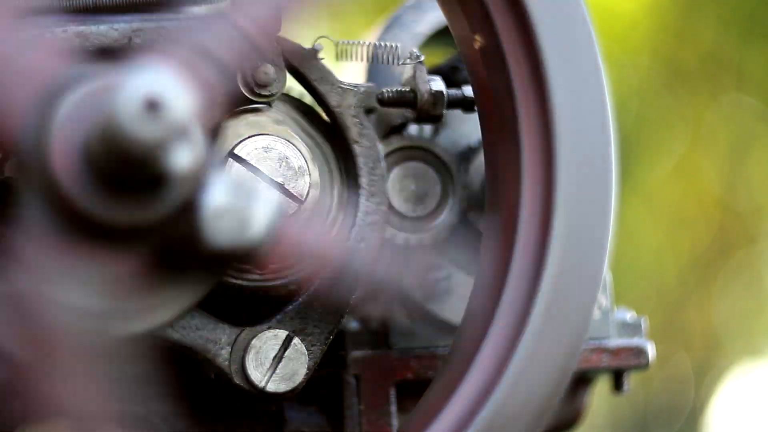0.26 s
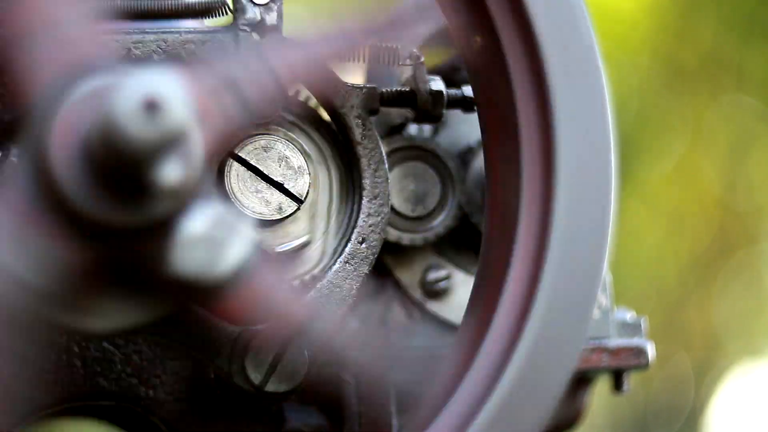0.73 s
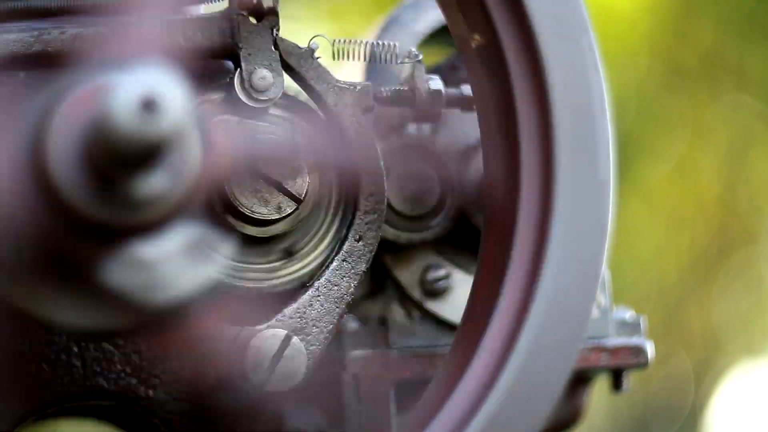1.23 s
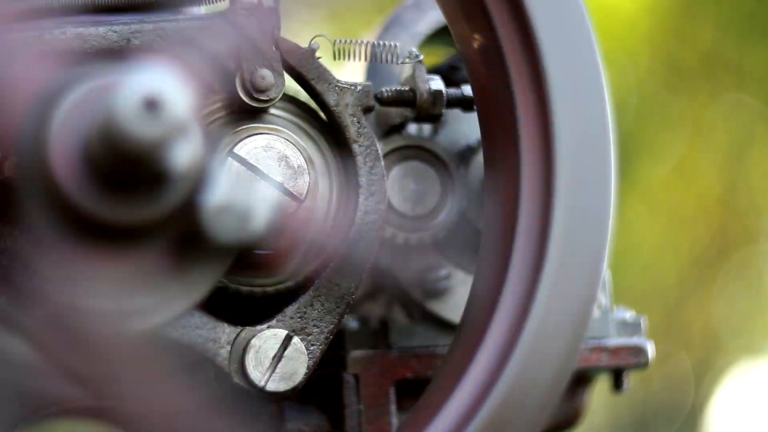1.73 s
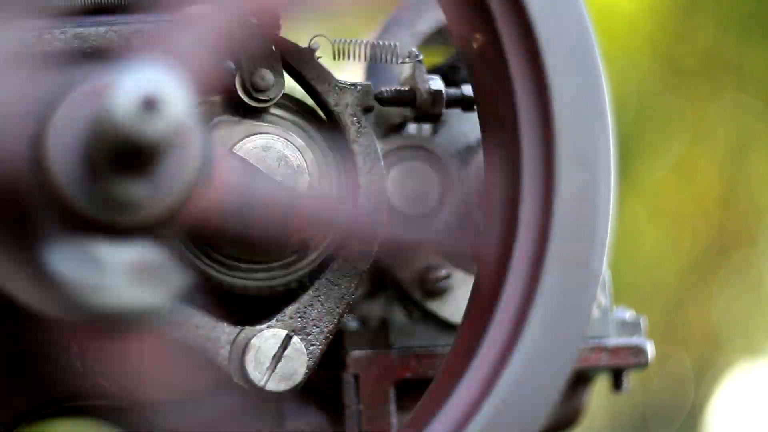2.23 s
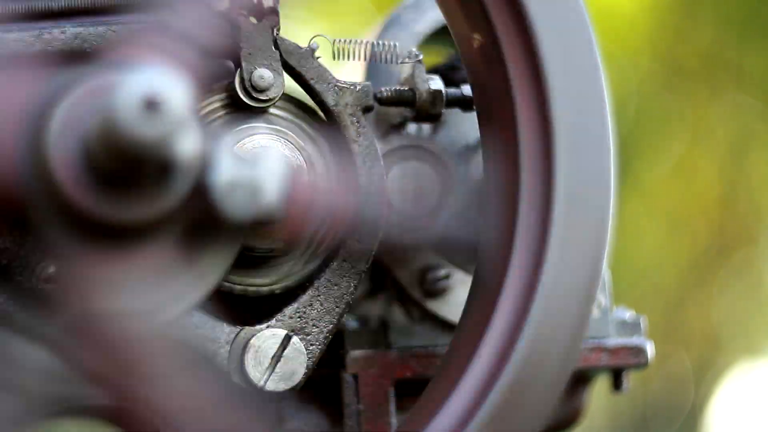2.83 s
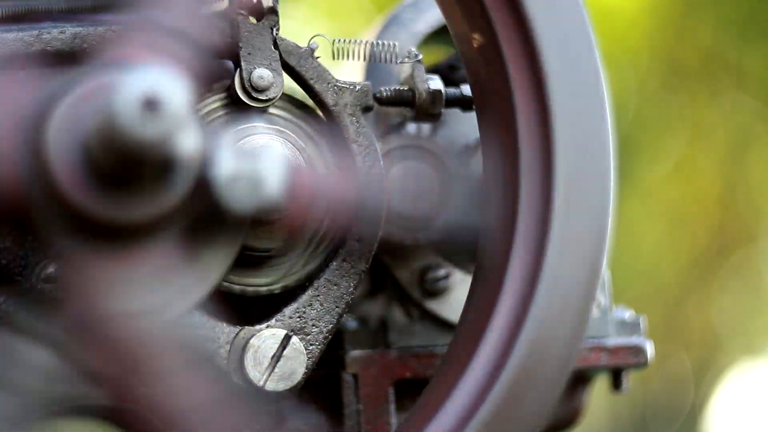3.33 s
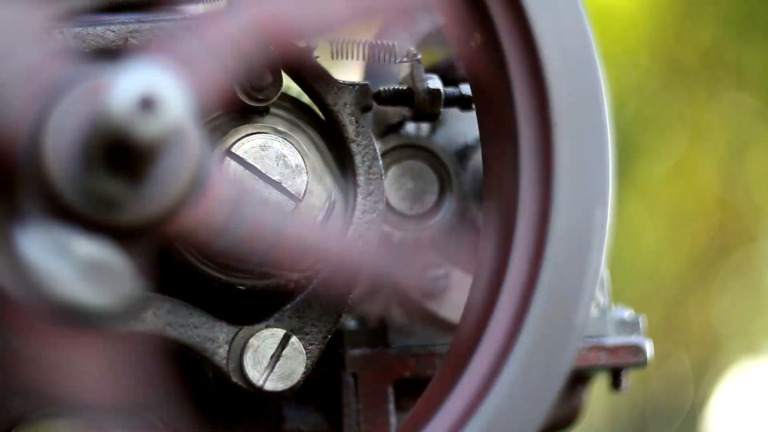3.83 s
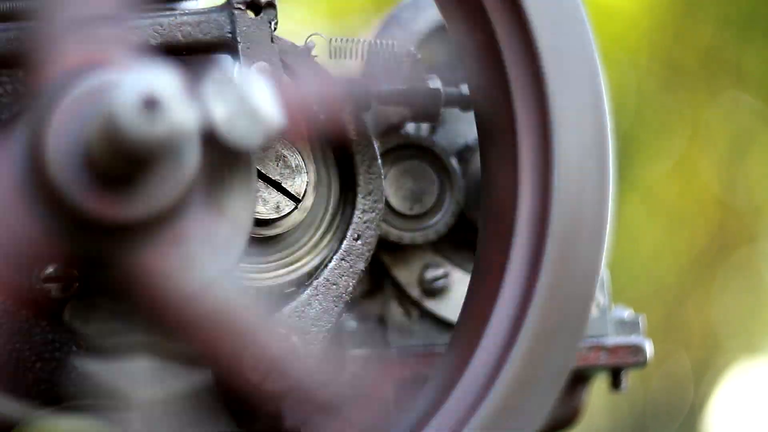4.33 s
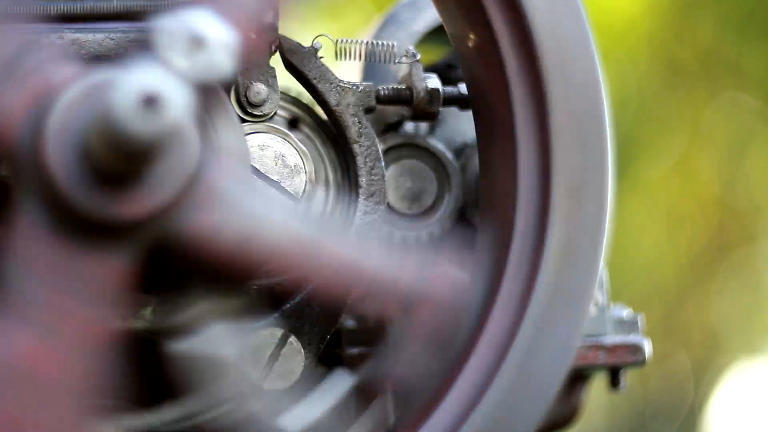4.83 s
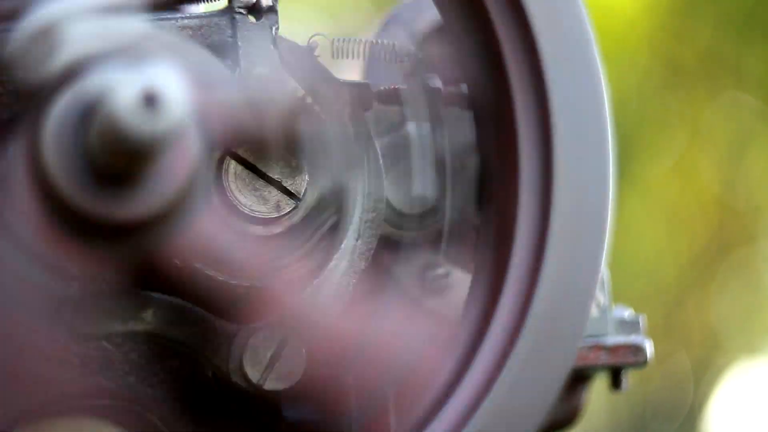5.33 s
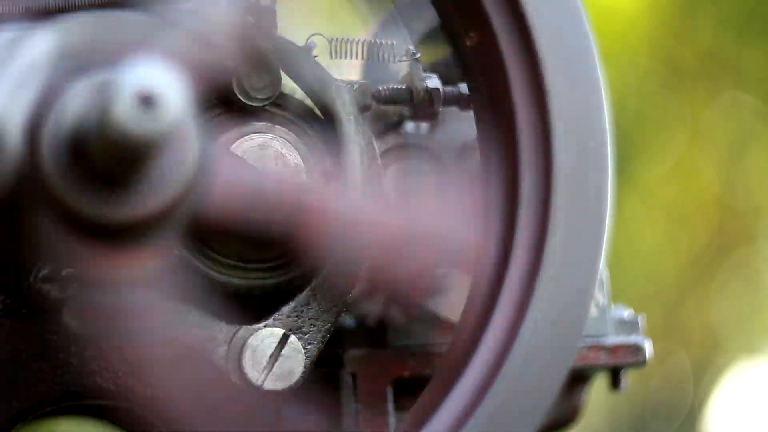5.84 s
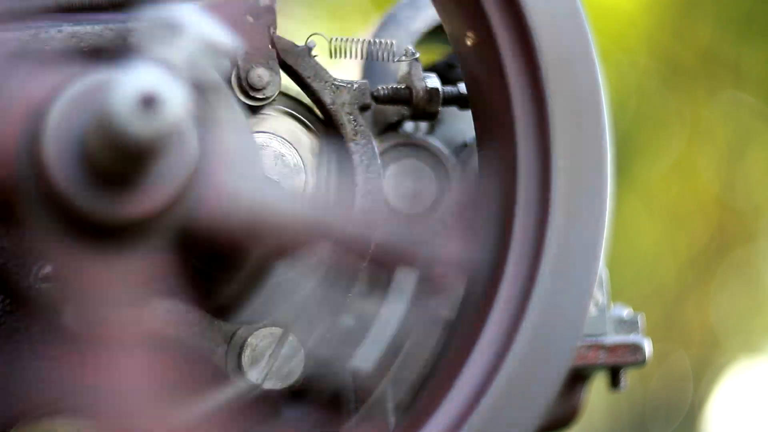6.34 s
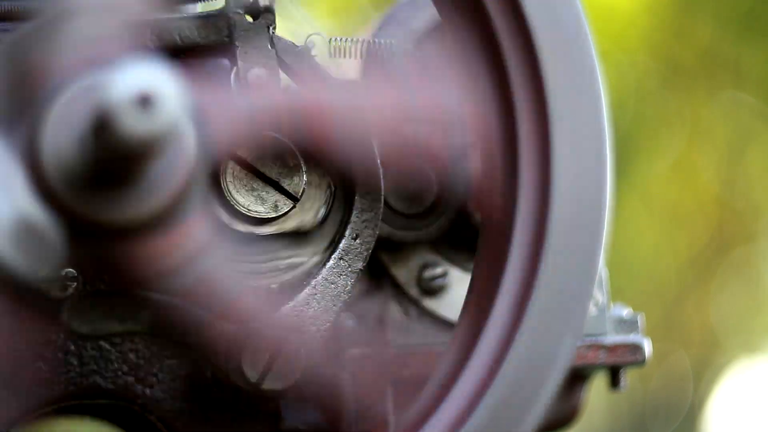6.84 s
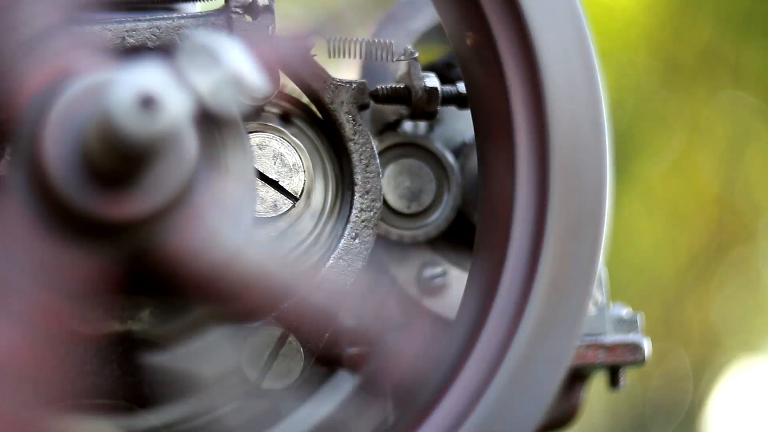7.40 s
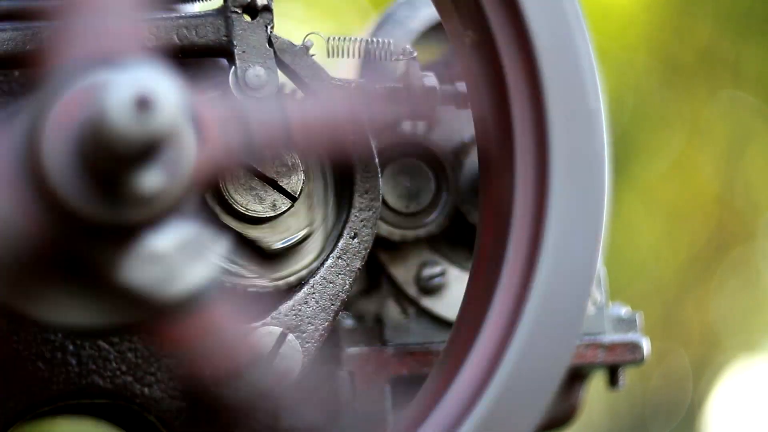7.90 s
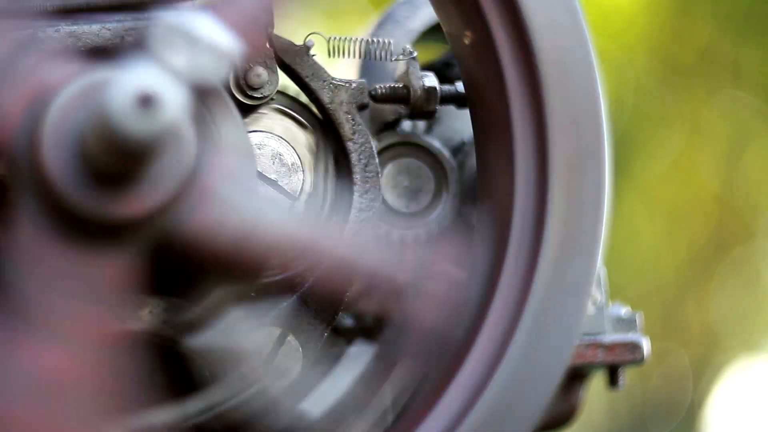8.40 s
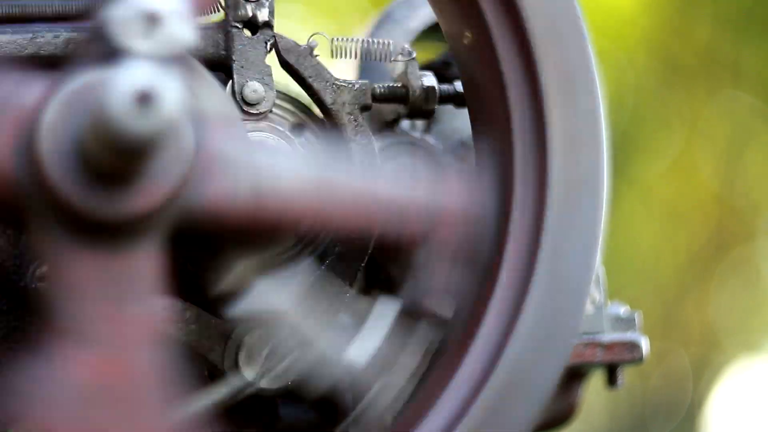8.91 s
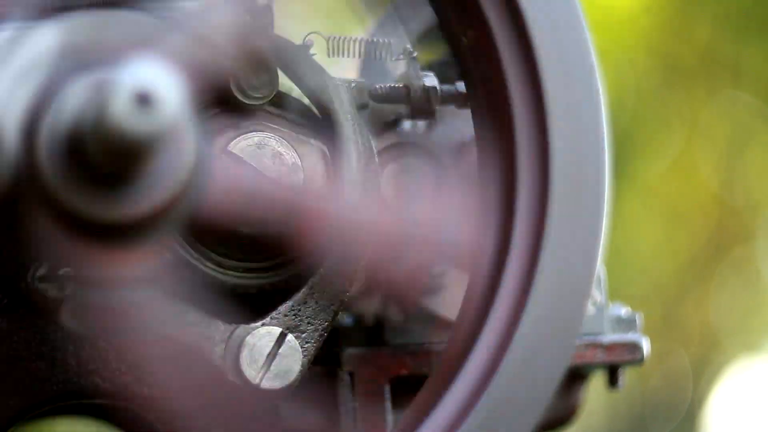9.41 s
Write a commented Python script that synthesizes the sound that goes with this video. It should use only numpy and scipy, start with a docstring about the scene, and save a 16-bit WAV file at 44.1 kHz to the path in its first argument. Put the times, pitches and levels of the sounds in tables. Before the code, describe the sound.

Close up outdoors, a small old hit-and-miss engine coasts with rapid metallic clacks, latch rattles and gear whirr. Almost at once the intake snorts, harder clacks follow and the exhaust puffs; the ticking jumps faster, then gradually slows for four seconds while breathy hoots grow. This happens three times, the last near the end. No room echo, barely any breeze.

```python
"""A small hit-and-miss engine outdoors, heard close, over a faint low stir of air.
It opens near the end of a coast: valve gear clacks at fixed cam angles, air hoots through the exhaust valve.
Then the latch lets go: the intake valve snorts, the charge fires and leaves in a puff, the wheels run fast.
Friction and drag slow them again, the latch rattles ever later in the turn and the hoots grow louder.
Snort and puff come three times; blows are noise cracks plus ringing modes, gas and gears shaped noise."""
import sys
import numpy as np
from scipy import signal
from scipy.fft import rfft, irfft, next_fast_len
from scipy.io import wavfile
from scipy.ndimage import uniform_filter1d

SR = 44100
rng = np.random.default_rng(int(sys.argv[2]) if len(sys.argv) > 2 else 0)


def wav_record(signal):
    """Record a signal, one row per channel, as 16-bit PCM in the file named by sys.argv[1]."""
    frames = np.transpose(np.atleast_2d(signal))
    bounded = np.clip(frames, -1, 1)
    # unit amplitude maps onto the largest positive 16-bit level
    quanta = np.round(bounded * 32767).astype(np.int16)
    wavfile.write(sys.argv[1], SR, quanta)


N = 426006
TIME = np.arange(N) / SR


def amp(db):
    """Decibels to gain."""
    return 10 ** (np.asarray(db) / 20)


def evened(x):
    """Scales each row to rms 1."""
    return x / np.sqrt(np.mean(x ** 2, axis=-1, keepdims=True) + 1e-20)


def add(mix, start_s, sound):
    """Mixes a sound in at a start time."""
    part = mix[max(round(start_s * SR), 0):][:len(sound)]
    part += sound[:len(part)]


def decay(t, t60_s):
    """Exponential decay by 60 dB in t60_s."""
    return np.exp(-np.log(1000) * t / t60_s)


def bump(t, centre_s, half_s):
    """Gaussian envelope, down to 1/e at half_s from its centre."""
    return np.exp(-((t - centre_s) / half_s) ** 2)


def wander(shape, size):
    """Smooth random wavering of rms 1 along the last axis."""
    smooth = uniform_filter1d(rng.standard_normal(shape), size)
    return evened(uniform_filter1d(smooth, size))


def noise(colour, shape, band_hz=(0, np.inf), ripple_db=0, ripple_size=50):
    """Rows of rms 1 noise with a given spectrum within a band; ripple gives each row its own peaks."""
    size = next_fast_len(shape[-1])
    hz = np.fft.rfftfreq(size, 1 / SR)
    colour_hz, colour_db = np.transpose(colour)
    ripple = ripple_db * wander(shape[:-1] + hz.shape, size=ripple_size)
    gain = amp(np.interp(np.log(hz + 1), np.log(colour_hz), colour_db) + ripple)
    gain = gain * (hz >= band_hz[0]) * (hz < band_hz[1])
    spectrum = rfft(rng.standard_normal(shape[:-1] + (size,))) * gain
    return evened(irfft(spectrum, size)[..., :shape[-1]])


# outdoor air, level: (time [s], level [dB])
BREEZE_LEVEL = [(0, -84), (1.1, -78), (1.7, -86), (2.1, -77), (4.4, -78), (5.1, -78), (5.5, -88),
                (7.1, -88), (8.3, -79), (8.6, -70), (9.1, -72), (9.5, -90)]
# outdoor air, spectrum: (frequency [Hz], relative level [dB])
BREEZE_COLOUR = [(10, 2.5), (25, -9), (45, 8), (80, 2.5), (130, 2), (300, -20), (2000, -47)]


def breeze():
    """Faint low stir of air: shaped noise with a slowly changing level."""
    return amp(np.interp(TIME, *np.transpose(BREEZE_LEVEL))) * noise(BREEZE_COLOUR, (N,))


# coasts of the flywheels: (time at which the cam comes round [s], speed then [turns/s])
COASTS = [(-2.9117, 10.995), (1.1366, 10.995), (5.185, 10.982), (9.2447, 10.97)]
FRICTION_TURNS_PER_S2, DRAG_PER_S = 0.366, 0.11667  # dry friction; share of speed lost per s
LAST_TURN = 30  # crank turn of a coast on which the governor lets the latch go


def coasting(angle_turns=0, every=1):
    """Rows (time [s], speed in that turn [turns/s], turn number) of a slowing crank passing an angle."""
    t, rows = np.arange(-SR // 2, 5 * SR, 50) / SR, []
    friction_speed = FRICTION_TURNS_PER_S2 / DRAG_PER_S
    for start_s, first_speed in COASTS:
        speed = (first_speed + friction_speed) * np.exp(-DRAG_PER_S * t) - friction_speed
        turned = (first_speed - speed - FRICTION_TURNS_PER_S2 * t) / DRAG_PER_S
        for turn in np.arange(-2, LAST_TURN + 1, every) + angle_turns:
            s = start_s + np.interp(turn, turned, t)
            if -1 <= turn < LAST_TURN + 0.5 and s > -0.5:
                # speed at the start of the turn; angles just before a turn count as its start
                rows.append((s, np.interp(np.floor(turn + 0.05), turned, speed), turn))
    return np.array(rows)


# running noise against speed: (speed [turns/s], relative level [dB])
RUNNING_LEVEL = [(6.3, -58.5), (7.2, -60.5), (8.2, -62), (9.7, -63.5), (10.5, -60.5), (11, -59),
                 (11.15, -56.5)]
SHUT_DB = -64.5  # relative level, quieter with the exhaust valve shut
COMPRESSION_DELAY_S, EXHAUST_DELAY_S = 0.055, 0.005  # turn starts after snort and puff


def crank_turns():
    """Rows (start [s], relative running noise level [dB]) for all turns, coasting or working."""
    s, speed, turn = coasting().T
    level_db = np.where(turn < LAST_TURN, np.interp(speed, *np.transpose(RUNNING_LEVEL)), SHUT_DB)
    working_s = np.ravel(np.add(FIRINGS, [COMPRESSION_DELAY_S, EXHAUST_DELAY_S]))
    return np.array(sorted([*zip(s, level_db), *((start_s, SHUT_DB) for start_s in working_s)]))


# quickly dying modes of a rattle, also of slack ticks: (frequency [Hz], relative level [dB])
RATTLE_COLOUR = [(100, -37), (250, -7), (450, 3.5), (600, -0.5), (1000, -0.5), (1600, -2.5), (2800, 4.5),
                 (3800, -5), (4600, 5.5), (5600, -5), (7000, -7.5), (9000, -9.5), (12000, -15),
                 (16000, -35)]


def loose_play(turns, count=12, base_db=-58, spread_db=3.0, t60_s=0.014, ripple_db=7,
               busiest_turns=0.5, spread_turns=0.25):
    """Slack in gear teeth and linkage ticks faintly, mostly in mid turn, each tick with its own colour."""
    out, t = np.zeros(N), np.arange(SR // 50) / SR
    starts = np.array([s for s, _ in turns if 0 < s < N / SR])
    for start_s, length_s in zip(starts, np.diff(starts, append=N / SR)):
        ticks = noise(RATTLE_COLOUR, (count, len(t)), ripple_db=ripple_db, ripple_size=24)
        ticks = ticks * decay(t, t60_s) * (1 - np.exp(-t / 0.00022))
        sizes = amp(base_db + spread_db * np.minimum(rng.exponential(1, count), 3))
        shares = rng.normal(busiest_turns, spread_turns, count) % 1
        for share, size, tick in zip(shares, sizes, ticks):
            add(out, start_s + share * length_s, size * tick)
    return out


# spectra of gear rumble and piston swish: (frequency [Hz], relative level [dB])
RUMBLE_COLOUR = [(60, -36), (140, -13.5), (210, -3.5), (290, 2), (360, 1), (490, 0.5), (580, -11.5),
                 (680, -2), (800, -5), (1200, -24), (3000, -54)]
SWISH_COLOUR = [(400, -23), (800, 2), (1050, 12.5), (1180, 1), (1275, 13.5), (1400, 6.5), (1750, 6.5),
                (2400, 8), (3400, 4.5), (5000, 5.5), (7500, -3), (12000, -17.5), (16000, -67)]
# course of one turn: (share of turn, rumble [relative dB], swish [relative dB],
# whirr [relative dB], whirr centre [Hz])
STROKE = [(0, -3, -5, -12, 2104), (.15, -4.5, 3, -9, 2400), (.28, 2, 5, 0, 2782), (.44, 6.5, 8, -7, 2860),
          (.62, -2.5, -5, 6, 2478), (.73, 2.5, 4.5, -0.5, 2172), (.86, -1, -6.5, -7, 2036),
          (1, -7, -1.5, -20, 2102)]


def running(turns, rumble_trim_db=-2, swish_trim_db=-4, whirr_trim_db=-7.5, swish_db_per_octave=4,
            reference_turn_s=0.16, whirr_width_hz=260, grain_db=3.5):
    """Gears rumble, the piston slides, a whirr rises and falls with its travel: noise shaped by turn."""
    s, turn_db = turns.T
    edges = np.r_[2 * s[0] - s[1], s, 2 * s[-1] - s[-2]]
    turn_share = np.interp(TIME, edges, np.arange(len(edges))) % 1
    middle = (edges[1:-1] + edges[2:]) / 2
    octaves_fast = np.interp(TIME, middle, np.log2(reference_turn_s / np.diff(edges)[1:]))
    share, *columns = np.transpose(STROKE)
    gear_db, slide_db, air_db, whirr_hz = (np.interp(turn_share, share, c) for c in columns)
    gears = amp(rumble_trim_db + gear_db) * noise(RUMBLE_COLOUR, (N,))
    # sliding faces catch and let go
    grain = evened(amp(grain_db * wander((N,), size=70)))
    swish_db = swish_trim_db + slide_db + swish_db_per_octave * octaves_fast
    piston = amp(swish_db) * grain * noise(SWISH_COLOUR, (N,))
    # narrow noise carried on the moving pitch
    lowpass = signal.butter(2, whirr_width_hz / 2, fs=SR, output="sos")
    real, imag = signal.sosfilt(lowpass, rng.standard_normal((2, N)))
    carrier = np.exp(2j * np.pi * np.cumsum(whirr_hz) / SR)
    whirr = amp(whirr_trim_db + air_db) * evened(((real + 1j * imag) * carrier).real)
    return amp(np.interp(TIME, middle, turn_db)) * (gears + piston + whirr)


# air pumped through the open exhaust valve: (speed [turns/s], relative level [dB], base pitch [Hz])
HOOTS = [(6.35, -46.5, 414), (6.9, -47.5, 421), (7.2, -49.5, 442), (7.45, -59, 445), (8.6, -58, 435),
         (9.3, -69, 420), (10.9, -65, 405), (11.15, -52.5, 400)]
HOOT_ANGLE_TURNS = 0.392


def hoots(trim_db=1.3, half_s=0.0062, sag_per_s=8.76, tail_s=0.03, tail_db=-9, rough=0.28,
          scatter_db=1, detune=0.015):
    """The cylinder sounds like a blown bottle once a turn; pitch sinks as the piston draws back."""
    out, t = np.zeros(N), np.arange(-SR // 25, SR // 14) / SR
    swell = bump(t, 0, half_s) + amp(tail_db) * bump(t, tail_s, half_s)
    speeds, *columns = np.transpose(HOOTS)
    for s, speed, turn in coasting(HOOT_ANGLE_TURNS):
        if s < 0 or turn > LAST_TURN:
            continue
        db, hz = (np.interp(speed, speeds, c) for c in columns)
        db = db + scatter_db * rng.standard_normal()
        hz = hz * (1 + detune * rng.standard_normal())
        cycles = np.cumsum(hz * np.exp(-sag_per_s * np.maximum(t, 0))) / SR + rng.random()
        flutter = 1 + rough * evened(uniform_filter1d(rng.standard_normal(len(t)), size=200))
        tone = np.sqrt(2) * np.sin(2 * np.pi * cycles)
        add(out, s + t[0], amp(db + trim_db) * swell * flutter * tone)
    return out


# working strokes: (intake snort [s], exhaust puff [s])
FIRINGS = [(0.7647, 0.9385), (4.8140, 4.9878), (8.8713, 9.0472)]
# intake valve fluttering open and shut: (delay [s], relative level [dB], pitch [Hz], half length [s])
SNORT = [(-0.0208, -36.5, 200, 0.0018), (0, -32, 228, 0.0016), (0.0218, -37.5, 230, .0017)]
# burning charge, valve opening, blast, pipe ring: (delay [s], relative level [dB], pitch [Hz], half length [s])
PUFF = [(-0.030, -46, 410, 0.0034), (-0.001, -39.5, 670, 0.0032), (0.002, -41, 149, 0.0046),
        (0.014, -41.5, 255, 0.0037)]
# gas rushing around snort and puff: (delay [s], relative level [dB], half length [s])
INTAKE_RUSH = [(-0.033, -53, 0.026), (-0.021, -45, 0.0012), (-0.011, -45, 0.0075), (0.0005, -41, 0.0018),
               (0.019, -44, 0.0018), (0.025, -50, 0.005)]
EXHAUST_RUSH = [(-0.034, -49.5, 0.011), (0.003, -39.5, 0.0034)]
# spectrum of rushing gas: (frequency [Hz], relative level [dB])
GAS_COLOUR = [(35, -30), (75, 6), (110, -3), (350, -3), (600, -3.5), (1000, -1), (1500, -10), (2200, -9.5),
              (4000, -11), (12000, -30)]


def firings(ragged_db=5, port_hz=62):
    """Intake snort, then burning charge and ragged puff: short pressure pulses plus rushing gas noise."""
    out, t = np.zeros(N), np.arange(-SR // 8, SR // 8) / SR
    for times in FIRINGS:
        for s, pulses, rushes in zip(times, (SNORT, PUFF), (INTAKE_RUSH, EXHAUST_RUSH)):
            pressure = sum(amp(db) * bump(t, delay, half_s) * np.sin(2 * np.pi * hz * (delay - t))
                           for delay, db, hz, half_s in pulses)
            flow = sum(amp(db) * bump(t, delay, half_s) for delay, db, half_s in rushes)
            eddies = evened(amp(ragged_db * wander(t.shape, size=60)))
            add(out, s + t[0], pressure + flow * eddies * noise(GAS_COLOUR, t.shape))
    # small ports radiate no deep bass
    highpass = signal.butter(2, port_hz, "high", fs=SR, output="sos")
    return signal.sosfiltfilt(highpass, out)


# push rod blows, the cam going round once in two crank turns: (crank angle [turns],
# relative level above split [dB], same below split [dB], gain when slow [dB], gain when fast [dB])
CLACKS = [(0, -43.5, -43, 8, 4.5), (0.04, -43, -50.5, 3, -2), (0.086, -38.5, -53, 1, 0.5),
          (1.054, -40.5, -51.5, 6.5, 1), (1.08, -40.5, -57, -2, -1)]
# light knocks of the linkage, same columns
KNOCKS = [(0.282, -48, -49.5, 0.81, 6), (0.417, -52, -56.5, 0.9, -1), (1.19, -56, -62, 2, 5)]
# turns/s: blows change below SLOW, where the latch gives up its load, and from EASY up to FAST
SLOW, SLOW_RANGE, EASY, FAST = 6.62, 0.09, 9.84, 11.05


def cam_blows(contacts, body_share=0.5):
    """Each contact strikes at its own cam angle; its force changes at both ends of the speed range."""
    rows = []
    for angle, high_db, low_db, slow_db, fast_db in contacts:
        s, speed, turn = coasting(angle, every=2).T
        slow_gain_db = slow_db / (1 + np.exp((speed - SLOW) / SLOW_RANGE))
        fast_gain_db = fast_db * np.maximum(speed - EASY, 0) / (FAST - EASY)
        gain_db = slow_gain_db + fast_gain_db
        blow_rows = np.c_[s, high_db + gain_db, low_db + body_share * gain_db]
        rows += list(blow_rows[np.round(turn) < LAST_TURN])
    return rows


# latch blows, later as the governor weight sinks inward; first and second turn of the cam:
# (speed [turns/s], crank angle [turns], relative level above split [dB], same below split [dB])
LATCH_FIRST = [(6.85, 0.98, -41.5, -53), (7.2, 0.53, -58, -60), (7.55, 0.45, -48, -55),
               (7.9, 0.414, -45, -56), (9.1, 0.371, -43, -51.5), (9.8, 0.36, -41.5, -53.5),
               (11.3, 0.352, -38, -54)]
LATCH_SECOND = [(7, 1.6, -54, -58), (7.38, 1.472, -45.5, -50), (7.71, 1.423, -43.5, -50.5),
                (8.2, 1.385, -41, -51), (9, 1.369, -39, -50), (9.9, 1.354, -41, -54.5),
                (11.3, 1.354, -37.5, -56)]


def latch_blows():
    """Speed sets angle and force of the latch; below its lowest speed it no longer strikes."""
    rows = []
    for side, curve in enumerate((LATCH_FIRST, LATCH_SECOND)):
        s, speed, _ = coasting(side, every=2).T
        speeds, *columns = np.transpose(curve)
        angle, high_db, low_db = (np.interp(speed, speeds, c) for c in columns)
        delay_s = (angle - side) / speed
        # the wheels slow a little on the way
        delay_s *= 1 + delay_s * (FRICTION_TURNS_PER_S2 / speed + DRAG_PER_S) / 2
        rows += list(np.c_[s + delay_s, high_db, low_db][speed >= speeds[0]])
    return rows


# valve gear blows around snort and puff:
# (delay [s], relative level above split [dB], relative level below split [dB])
INTAKE_CLACKS = [(-0.118, -43.5, -39.5), (-0.1102, -35.5, -46), (-0.1045, -31.5, -55), (0.0556, -33, -45.5),
                 (0.067, -41.5, -67)]
EXHAUST_CLACKS = [(-0.028, -30.5, -43), (0.0012, -34, -44)]
INTAKE_RATTLES = [(-0.071, -47, -56), (-0.0165, -55, -56), (-0.001, -45, -46), (0.0172, -48, -49.5)]
EXHAUST_RATTLES = [(-0.0505, -45.5, -56), (-0.0072, -39, -53), (0.042, -50, -63), (0.0478, -46, -59)]


def firing_blows(intake, exhaust):
    """The same few blows go with every snort and every puff."""
    return [(s + delay, high_db, low_db)
            for times in FIRINGS
            for s, group in zip(times, (intake, exhaust))
            for delay, high_db, low_db in group]


def uneven(rows, jitter_s=0.0004, scatter_db=0.7):
    """Play in the linkage makes each blow a little early or late, hard or soft."""
    rows = np.array(rows) + rng.standard_normal(np.shape(rows)) * [jitter_s, scatter_db, scatter_db]
    return rows[(rows[:, 0] > 0) & (rows[:, 0] < N / SR)]


# spring bounces after a hard blow: (mean delay [s], level relative to blow before trim [dB], mean pitch [Hz])
CHATTER = [(.0065, -10, 12400), (0.0118, -11.5, 12450)]


def spring_chatter(rattles, trim_db=-2, hard_db=-44, half_s=0.00087, jitter_s=0.0012, detune=0.025,
                   scatter_db=3):
    """Tiny high pings as the latch spring bounces to rest after a hard blow."""
    out, t = np.zeros(N), np.arange(-SR // 250, SR // 250) / SR
    for s, blow_db, _ in rattles:
        draws = rng.standard_normal((len(CHATTER), 3))
        for (delay, db, hz), (late, bend, size) in zip(CHATTER, draws):
            ping = bump(t, 0, half_s) * np.sin(2 * np.pi * hz * (1 + detune * bend) * t)
            gain = (blow_db > hard_db) * amp(trim_db + blow_db + db + scatter_db * size)
            add(out, s + delay + jitter_s * late + t[0], gain * ping)
    return out


# ringing of iron and steel parts: (mean frequency [Hz], t60 [s],
# relative level under a clack [dB], relative level under a rattle [dB])
MODES = [(219, 0.17, -16, -16), (289.3, 0.15, -20, -15), (409, 0.071, -24, -14), (485, 0.074, -28, -16.5),
         (656.6, 0.18, -16, -15), (715, 0.065, -17, -16.5), (1015, 0.065, -16, -18.5),
         (1153, 0.075, -20, -17), (1274, .25, -17, -12.5), (2050, 0.04, -14.5, -8.5),
         (2380, 0.036, -22, -37), (3345, 0.16, -18.5, -15.5), (4300, 0.024, -39, -18),
         (4460, 0.018, -15.5, -12), (4616, 0.042, -10, -17), (5250, 0.18, -25, -23),
         (6800, 0.056, -16.5, -16.5), (7480, .03, -26, -22), (9430, 0.037, -10.5, -29),
         (12550, 0.027, -21, -21)]
SPLIT_HZ = 3100  # body below, brightness above


def blows(rows, colour, mode_db, bright_trim_db, body_trim_db, bright_t60_s, body_t60_s, rise_s,
          scatter_db, detune, ripple_db, lumpy_db):
    """Each blow is a short ragged crack plus ringing modes, a little different every time."""
    s, high_db, low_db = np.transpose(rows)
    mode_hz, mode_t60_s = np.transpose(MODES)[:2]
    t = np.arange(SR // 9) / SR
    shape = (len(s), len(t))
    # contact point sets how hard each mode is struck; load on the part bends its pitch
    strength, bend, phase = rng.standard_normal((len(s), len(mode_hz), 3)).T[..., None]
    rise = 1 - np.exp(-t / rise_s)

    def ring(k):
        """One decaying mode for all blows."""
        cycles = mode_hz[k] * (1 + detune * bend[k]) * t + phase[k]
        tone = np.sqrt(2) * np.cos((2 * np.pi * cycles).astype(np.float32))
        return amp(mode_db[k] + scatter_db * strength[k]) * evened(decay(t, mode_t60_s[k])) * tone

    # the faces meet in several tiny contacts
    contact = amp(lumpy_db * wander(shape, size=45)) * rise
    lowpass = signal.butter(2, 6500, fs=SR, output="sos")
    # heavy castings give the body, small steel parts the brightness
    bands = [((0, SPLIT_HZ), low_db + body_trim_db, body_t60_s),
             ((SPLIT_HZ, np.inf), high_db + bright_trim_db, bright_t60_s)]
    sounds = 0
    for band_hz, level_db, t60_s in bands:
        crack = evened(noise(colour, shape, band_hz, ripple_db) * contact * decay(t, t60_s))
        # the highest part of the crack dies first
        dull = signal.sosfiltfilt(lowpass, crack)
        crack = evened(dull + (crack - dull) * np.exp(-t / 0.02))
        in_band = (mode_hz >= band_hz[0]) & (mode_hz < band_hz[1])
        rings = sum(ring(k) for k in np.flatnonzero(in_band))
        sounds = sounds + amp(level_db)[:, None] * evened(crack + rings * rise)
    out = np.zeros(N)
    for start_s, sound in zip(s, sounds):
        add(out, start_s, sound)
    return out


# quickly dying modes of a clack: (frequency [Hz], relative level [dB])
CLACK_COLOUR = [(100, -48), (220, -8), (560, -9), (820, -9.5), (1000, -0.5), (1500, -6.5), (2300, 0.5),
                (3500, -2.5), (4600, 1), (7200, 3.5), (8300, -4), (10500, -2.5), (13000, -8.5),
                (16000, -24.5)]


def valve_gear(clacks, rattles):
    """Push rod clacks and latch rattles: the same modes, excited with different colour and attack."""
    clack_db, rattle_db = np.transpose(MODES)[2:]
    rod = blows(clacks, CLACK_COLOUR, clack_db, bright_trim_db=-13.5, body_trim_db=-13.5,
                bright_t60_s=0.031, body_t60_s=0.045, rise_s=0.0008,
                scatter_db=3.5, detune=0.007, ripple_db=3.6, lumpy_db=2)
    latch = blows(rattles, RATTLE_COLOUR, rattle_db, bright_trim_db=-11.5, body_trim_db=-11.5,
                  bright_t60_s=0.042, body_t60_s=0.061, rise_s=0.00023,
                  scatter_db=2.5, detune=0.008, ripple_db=2.4, lumpy_db=2.5)
    return rod + latch


# loose latch blows during the first firing only:
# (time [s], relative level above split [dB], relative level below split [dB])
STRAYS = [(0.843, -42, -66), (0.889, -38.5, -49)]


def scene():
    """The engine in the open air, with no room around it."""
    clacks = uneven(cam_blows(CLACKS) + firing_blows(INTAKE_CLACKS, EXHAUST_CLACKS))
    firing_rattles = firing_blows(INTAKE_RATTLES, EXHAUST_RATTLES)
    rattles = uneven(cam_blows(KNOCKS) + latch_blows() + firing_rattles + list(STRAYS))
    turns = crank_turns()
    background = breeze() + loose_play(turns) + running(turns)
    gas = hoots() + firings()
    gear = spring_chatter(rattles) + valve_gear(clacks, rattles)
    return (background + gas + gear)[None]


def record(dry):
    """The recorder's band limit: a linear-phase lowpass."""
    edge_hz = 16100
    lowpass = signal.firwin(401, edge_hz, window=("kaiser", 8), fs=SR)
    return signal.oaconvolve(dry, lowpass[None], "same")


dry = scene()
out = record(dry)
wav_record(out)
```